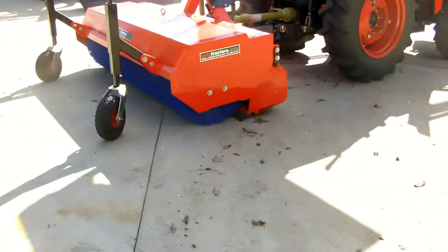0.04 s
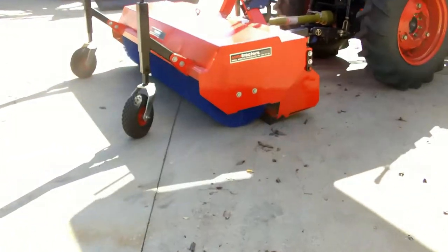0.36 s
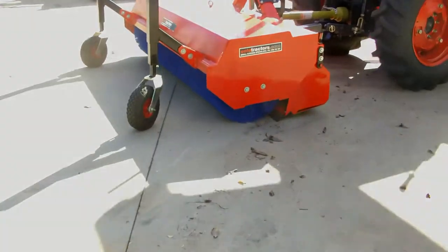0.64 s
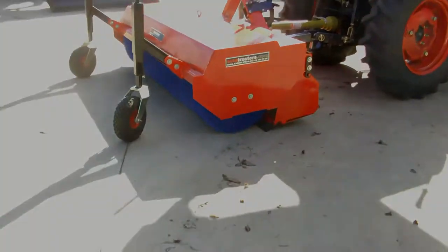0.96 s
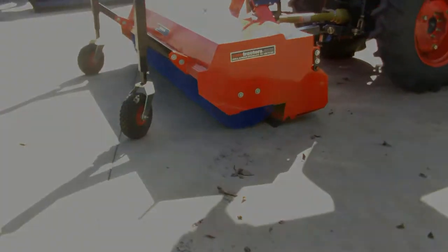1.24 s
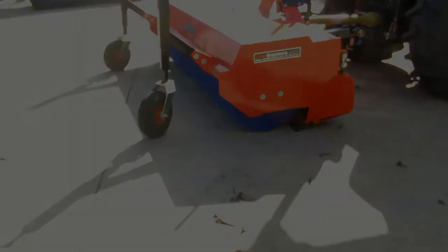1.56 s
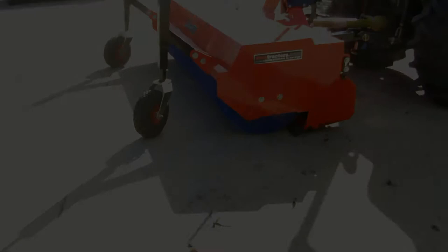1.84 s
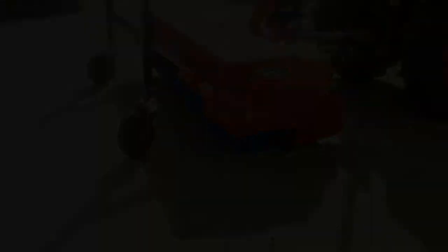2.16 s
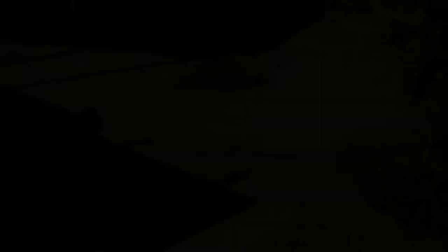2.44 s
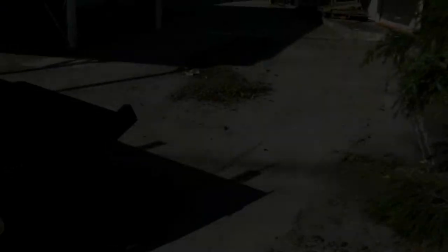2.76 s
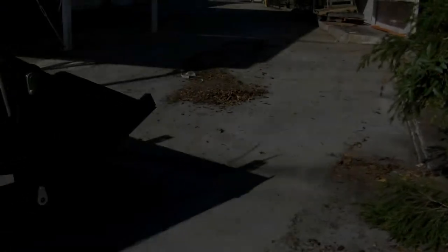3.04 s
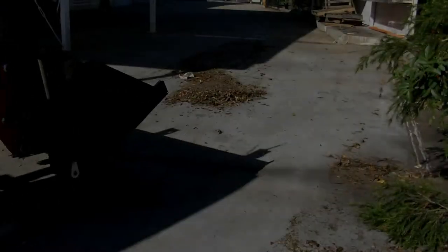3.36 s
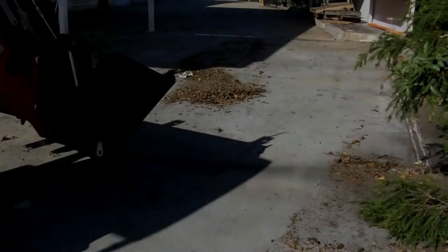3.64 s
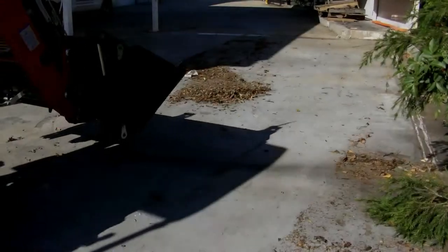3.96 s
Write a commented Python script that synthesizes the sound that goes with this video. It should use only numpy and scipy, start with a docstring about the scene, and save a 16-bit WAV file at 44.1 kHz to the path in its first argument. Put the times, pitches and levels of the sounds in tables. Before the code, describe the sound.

A diesel tractor runs a rotary broom over concrete. At first the bristles hiss brightly up close, over engine knocking and a rattling drive chain. This fades steadily to silence by about 2.3 seconds. From about 2.4 seconds the tractor fades back in from the other side, growing until 4 seconds, its engine clattering slightly faster, with faint gear whine and much weaker brushing. A faint low rumble lies underneath.

```python
"""A small four-cylinder diesel tractor drives a rotary broom over a concrete yard.
First, close by the broom, bristles hiss by friction and flick grit, while the impacts of the drive chain
excite the modes of the steel hood and the engine knocks behind them. This view fades to silence.
Then a second fades in from the other side: the engine clatters a little faster, gears whine faintly
and the screened brush is weaker. A low rumble lies under both views."""
import sys
import numpy as np
from scipy import signal
from scipy.fft import rfft, irfft
from scipy.io import wavfile

SR = 44100
rng = np.random.default_rng(int(sys.argv[2]) if len(sys.argv) > 2 else 0)


def unload_wav(signal):
    """Save mono or channel-first audio to the path in sys.argv[1] as 16-bit WAV at rate SR, clipped to [-1, 1]."""
    wavfile.write(
        sys.argv[1],
        SR,
        np.round(np.clip(np.atleast_2d(signal).T, -1, 1) * 32767).astype(np.int16),
    )


N = 176400
T = np.arange(N) / SR
HZ = np.maximum(np.arange(N // 2 + 1) * SR / N, 1)


def from_db(db):
    """Amplitude ratio of a level in decibels."""
    return 10 ** (np.asarray(db) / 20)


def unit_rms(x):
    """Normalisation to unit power."""
    return x / np.sqrt(np.mean(x ** 2) + 1e-20)


def envelope(rows):
    """Gain interpolated from (time [s], level [dB]) rows."""
    return from_db(np.interp(T, *np.transpose(rows)))


def by_hz(rows):
    """Interpolation along log frequency."""
    hz, value = np.transpose(rows)
    return np.interp(np.log(HZ), np.log(hz), value)


def colour(x, spectrum):
    """Spectral shaping to unit rms, with skirts of 12 dB per octave."""
    skirts = np.minimum(HZ / spectrum[0][0], 1) ** 2 * np.minimum(spectrum[-1][0] / HZ, 1) ** 2
    return unit_rms(irfft(rfft(x) * from_db(by_hz(spectrum)) * skirts, N))


def drift(corner_hz):
    """Low-pass random fluctuation of unit variance."""
    slow = irfft(rfft(rng.standard_normal(N)) / (1 + (HZ / corner_hz) ** 2) ** 2, N)
    return unit_rms(slow - slow.mean())


def resonator(x, hz, t60):
    """A damped mode: its free vibration falls 60 dB in t60 seconds."""
    r, w = from_db(-60 / (t60 * SR)), 2 * np.pi * hz / SR
    return signal.lfilter([1, -r * np.cos(w)], [1, -2 * r * np.cos(w), r * r], x + 1e-18)


# rumble spectrum: (frequency [Hz], relative density [dB])
RUMBLE = [(22, -11.5), (45, -2.5), (70, -4), (110, 3)]
def rumble():
    """Band-limited noise, heard as a faint low rumble."""
    return from_db(-64) * colour(rng.standard_normal(N), RUMBLE)


# gear bands: (frequency [Hz], level [dB], t60 [s])
GEAR_BANDS = [(617, -40.5, 0.12), (923, -43.5, .3), (1405, -49, 0.087), (1600, -47, 0.17),
              (1710, -43, 0.13), (3347, -43.5, .03)]
def gear_whine():
    """Narrow-band noise: meshing gears sing in faint, unsteady tones."""
    return sum(from_db(db) * unit_rms(resonator(rng.standard_normal(N), hz, t60))
               for hz, db, t60 in GEAR_BANDS)


def firing_count(firing_hz):
    """Phase is the integral of frequency: the firings of a governed engine whose speed wanders."""
    return np.cumsum(firing_hz * (1 + .002 * drift(3))) / SR


# engine hum and chain mesh (1.875 and its harmonics): (frequency [multiples of the firing rate])
TONE_RATIOS = [1, 1.875, 2, 3, 3.5, 3.75, 4, 4.25, 5.625, 7.5, 10]
# each tone, by the broom (NEAR) and from the other side (FAR): (level [dB])
NEAR_TONE_DB = [-63, -63.5, -58.5, -58, -52, -62, -59.5, -51, -52.5, -50, -45.5]
FAR_TONE_DB = [-57.5, -62, -55.5, -57, -55, -55, -53, -55, -54.5, -47, -43]
def hum_and_mesh(firings, levels_db, waver_db):
    """Forced vibration: engine hum and drive-chain mesh tones, locked to the firing rate."""
    tones = np.zeros(N)
    for ratio, db in zip(TONE_RATIOS, levels_db):
        amplitude = np.sqrt(2) * from_db(db + waver_db * drift(3.6))
        tones += amplitude * np.sin(2 * np.pi * (ratio * firings + rng.random()))
    return tones


# modes of the hood: (frequency [Hz], relative gain [dB], t60 [s])
HOOD_MODES = [(333, -17, 0.033), (403.4, 1.5, 0.09), (485.7, 0, 0.084), (554, -4.5, .06), (730, -2, .03),
              (1150, -9, 0.016), (1640, -2, 0.019)]
# how hard the chain drums: (time [s], level [dB])
CHAIN_LEVEL = [(0, -41), (.19, -34.5), (.24, -27), (.35, -30), (.45, -34.5), (.91, -32), (.96, -28.5),
               (1.18, -25.5), (1.3, -29), (1.38, -42), (1.45, -30.5), (1.8, -29), (1.95, -31), (2.3, -27.5)]
def chain(firings, teeth_per_firing=1.875, jitter_s=.00011, spread_db=2.5, throb_db=2.0):
    """Impact excitation: links drop onto the sprocket and ring the modes of the hood."""
    teeth = firings * teeth_per_firing
    onsets = np.flatnonzero(np.diff(np.floor(teeth)))
    timing, strength = rng.standard_normal((len(onsets), 2)).T
    onsets += (jitter_s * SR * timing).astype(int)
    hits = np.zeros(N)
    hits[np.clip(onsets, 0, N - 1)] = from_db(spread_db * strength)
    hits += .054 * np.exp(-(teeth % 1) / .25) * rng.standard_normal(N)   # each link rattles briefly
    hits *= from_db(throb_db * drift(17))   # the slack chain whips, so links strike unevenly
    hood = sum(from_db(db) * resonator(hits, hz, t60) for hz, db, t60 in HOOD_MODES)
    band = signal.butter(2, [310, 2200], "band", fs=SR, output="sos")
    return envelope(CHAIN_LEVEL) * unit_rms(signal.sosfilt(band, hood))


# knock of each cylinder: (relative level [dB])
KNOCK_DB = [2.1, -1, .5, -1.1]
# clatter spectra: (frequency [Hz], relative density [dB])
NEAR_CLATTER_SPECTRUM = [(55, -48), (100, -25), (170, -8.5), (275, -9), (350, 0.5), (550, -0.5), (730, -1),
                         (900, -5), (1650, -2.5), (2100, -6.5), (3000, -9), (6000, -15)]
FAR_CLATTER_SPECTRUM = [(55, -30.5), (100, -24.5), (165, -9), (220, -9.5), (290, -6.5), (440, -1),
                        (590, 0.5), (760, -2.5), (1050, -3), (1400, -0.5), (1720, -2.5), (2000, -5.5),
                        (2450, -5), (2850, -7.5), (3300, -7.5), (4200, -11), (8000, -17.5)]
# clatter envelopes: (time [s], level [dB])
NEAR_CLATTER_DB = [(0, -28.5), (.4, -26), (.9, -25.5), (1.4, -26), (1.9, -25), (2.15, -23.5), (2.33, -22.5)]
FAR_CLATTER_DB = [(2.42, -26), (2.8, -25), (3.1, -25), (3.6, -26), (3.85, -24.5), (4, -26.5)]
def clatter(firings, spectrum, levels, knock, decay_firings, repeat_share):
    """Cyclostationary noise: each firing knocks; valves and gears rattle partly alike every cycle."""
    cylinders = len(KNOCK_DB)
    strength = from_db(KNOCK_DB)[firings.astype(int) % cylinders]
    bursts = 1 + knock * strength * np.exp(-(firings % 1) / decay_firings)
    cycle_samples = int(cylinders * N / firings[-1])
    place_in_cycle = (firings / cylinders % 1 * cycle_samples).astype(int)
    repeating = np.sqrt(repeat_share) * rng.standard_normal((2, cycle_samples))[:, place_in_cycle]
    fresh = np.sqrt(1 - repeat_share) * rng.standard_normal((2, N))
    return envelope(levels) * colour(bursts * (repeating + fresh), spectrum)


# bristle spectra: (frequency [Hz], relative density [dB])
NEAR_HISS = [(500, -29), (1500, -12.5), (2800, -8.5), (4200, -4.5), (6100, -6.5), (7500, -3.5), (8700, 2),
             (10100, -1), (12400, 2), (15000, -3)]
FAR_HISS = [(1000, -20), (3000, -9), (4800, -3), (6500, -4), (7900, 0), (9300, 3.5), (11000, -4),
            (13400, 1), (15000, -2)]
# the brush bites harder and softer as it rides the floor: (time [s], level [dB])
NEAR_BITE_DB = [(0, -16), (.14, -16.5), (.47, -14.5), (.53, -16), (.87, -17), (1.0, -15), (1.18, -15),
                (1.35, -19), (1.55, -15.5), (1.75, -15.5), (1.92, -18), (2.1, -13.5), (2.2, -13),
                (2.26, -16.5), (2.35, -4)]
FAR_BITE_DB = [(2.42, -30), (2.8, -27.5), (3.2, -29), (3.55, -28.5), (3.85, -26), (4, -27.5)]
def brush(spectrum, levels, flicks_per_s, spread_db, flick_db, rows_hz, row_depth, flutter_db):
    """Friction noise: bristles drag on concrete and flick grit; their passing rows modulate the hiss."""
    sizes = from_db(spread_db * np.minimum(rng.exponential(1, N), 5))
    struck = rng.random(N) < flicks_per_s / SR
    flicks = unit_rms(struck * sizes * rng.standard_normal((2, N)))
    swell = 1 + row_depth * np.sin(2 * np.pi * (rows_hz * T + rng.random()))
    flutter = from_db(flutter_db * drift(40))
    hiss = colour(rng.standard_normal((2, N)) + from_db(flick_db) * flicks, spectrum)
    return envelope(levels) * swell * flutter * hiss


# likeness of the two microphone ports: (frequency [Hz], coherence [0 to 1])
NEAR_COHERENCE = [(1500, 0.98), (6700, 1), (7800, 0.62), (11000, 0.59), (15000, .69)]
FAR_COHERENCE = [(400, 0.98), (2000, .93), (4500, 0.42), (7000, 0.45), (15000, 0.52)]
# level difference: (frequency [Hz], left minus right [dB])
NEAR_TILT = [(6800, -1), (7800, -3), (8700, -8), (9700, 1.5), (10900, 11), (12100, 14), (13500, 6),
             (15000, 3)]
FAR_TILT = [(5000, -0.5), (8000, -2.5), (9300, -11.5), (10800, 12.5), (12300, 8), (14000, 1)]
# phase difference: (frequency [Hz], left lead [rad])
NEAR_LEAD = [(7900, 0), (9000, 1.04), (9900, 1.74), (10800, 1), (12000, 0.42), (13500, -.95), (15000, -.5)]
FAR_LEAD = [(200, 0), (2000, -0.08), (4000, -0.7), (5500, -1.5), (8200, -2.5), (10000, -1.2), (11500, -2.5),
            (13000, -3), (15000, -4.0)]
def stereo_pickup(noise, centred, coherence, balance, lead):
    """Partial coherence: two ports agree in the bass and differ in level and phase in the treble."""
    alike = np.clip(by_hz([(350, 1), *coherence]), 0, 1)
    mid = rfft(noise[0]) * np.sqrt((1 + alike) / 2) + rfft(centred)
    side = rfft(noise[1]) * np.sqrt((1 - alike) / 2)
    tilt = from_db(by_hz([(4000, 0), *balance]) / 2)
    turn = np.exp(.5j * by_hz(lead))
    left, right = (mid + side) * tilt * turn, (mid - side) / tilt / turn
    rms_gain = np.sqrt((tilt ** 2 + tilt ** -2) / 2)
    return irfft(np.array([left, right]) / rms_gain, N)


def other_side():
    """Acoustic shadow: the hood screens the brush, so the engine leads."""
    firings = firing_count(firing_hz=47.3)
    rattle = clatter(firings, FAR_CLATTER_SPECTRUM, FAR_CLATTER_DB,
                     knock=.47, decay_firings=.2, repeat_share=.39)
    hiss = brush(FAR_HISS, FAR_BITE_DB, flicks_per_s=5500, spread_db=1.5, flick_db=-4,
                 rows_hz=4.1, row_depth=.04, flutter_db=.5)
    centred = hum_and_mesh(firings, FAR_TONE_DB, waver_db=1.5) + gear_whine()
    return stereo_pickup(rattle + hiss, centred, FAR_COHERENCE, FAR_TILT, FAR_LEAD)


def beside_broom():
    """Superposition close to the brush: bright hiss over the chain and the engine."""
    firings = firing_count(firing_hz=43.07)
    rattle = clatter(firings, NEAR_CLATTER_SPECTRUM, NEAR_CLATTER_DB,
                     knock=.3, decay_firings=.25, repeat_share=.26)
    hiss = brush(NEAR_HISS, NEAR_BITE_DB, flicks_per_s=5000, spread_db=2.5, flick_db=-8,
                 rows_hz=7.2, row_depth=.025, flutter_db=.4)
    centred = hum_and_mesh(firings, NEAR_TONE_DB, waver_db=-.5) + chain(firings)
    return stereo_pickup(rattle + hiss, centred, NEAR_COHERENCE, NEAR_TILT, NEAR_LEAD)


def scene():
    """Power-law fades: one view falls to silence, then the next rises."""
    out_end_s, in_start_s, in_end_s = 2.359, 2.384, 4.044
    fade_out = np.clip(1 - T / out_end_s, 0, 1) ** 1.043
    fade_in = np.clip((T - in_start_s) / (in_end_s - in_start_s), 0, 1) ** 1.084
    background = rumble()
    return fade_out * (beside_broom() + background) + fade_in * (other_side() + background)


def record(dry):
    """Band limiting: a steep low-pass removes the highest treble."""
    cutoff_hz = 15300
    return irfft(rfft(dry) / np.sqrt(1 + (HZ / cutoff_hz) ** 600), N)


dry = scene()
out = record(dry)
unload_wav(out)
```